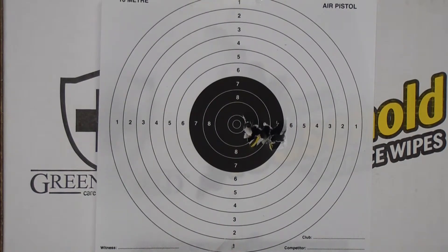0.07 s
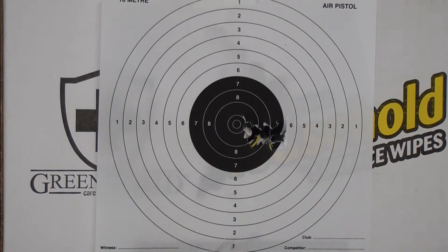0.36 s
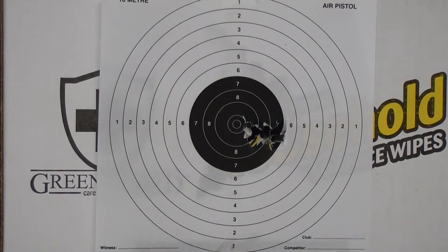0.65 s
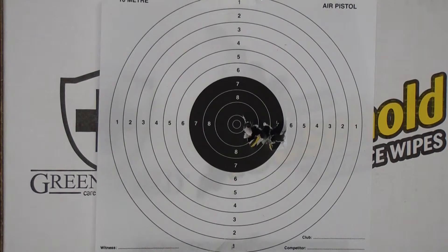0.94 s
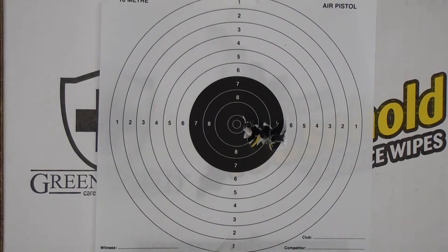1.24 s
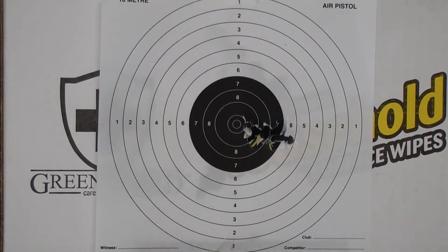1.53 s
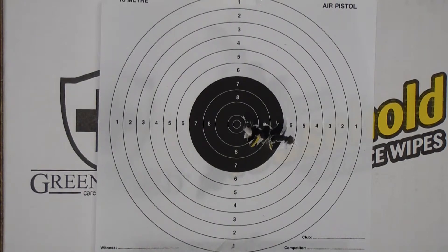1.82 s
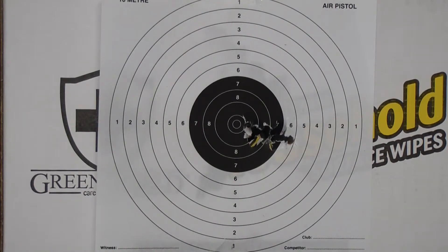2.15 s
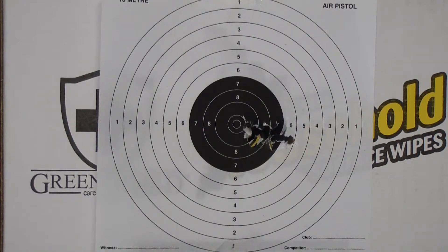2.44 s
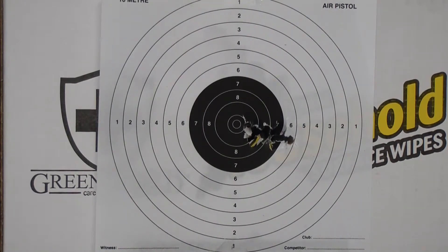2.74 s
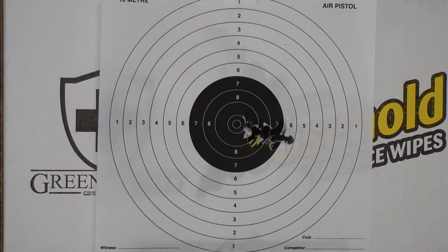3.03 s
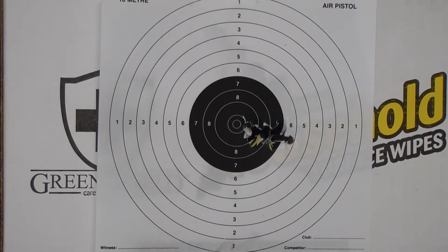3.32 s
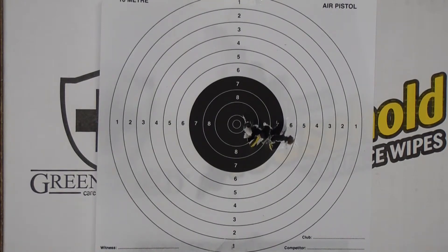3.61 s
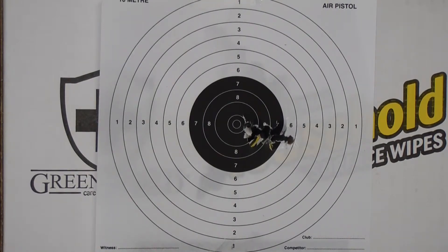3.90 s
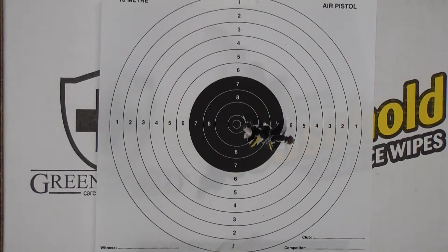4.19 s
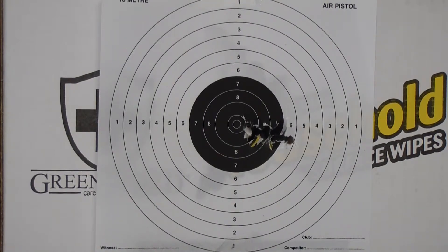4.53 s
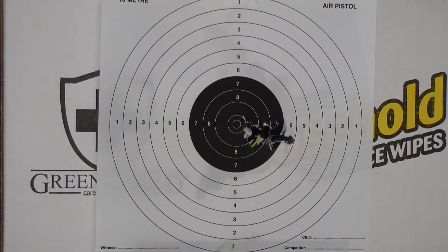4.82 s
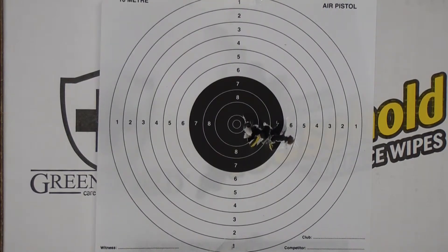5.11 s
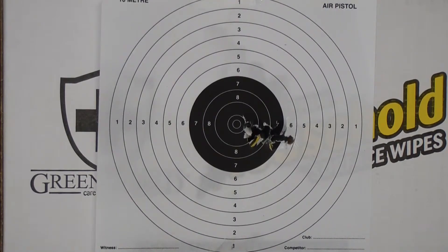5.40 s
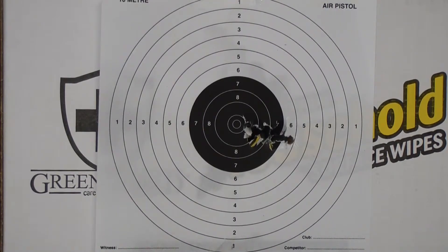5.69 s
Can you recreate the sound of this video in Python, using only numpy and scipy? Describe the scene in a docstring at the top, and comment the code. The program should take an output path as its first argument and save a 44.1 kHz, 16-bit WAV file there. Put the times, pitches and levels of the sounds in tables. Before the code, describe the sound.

An air pistol fires one sharp crack into a steel trap, then clicks and clacks as it is cocked in a small, bare room.

```python
"""Air pistol in a small, bare room

Heard from beside the target, a pellet tears the paper, slaps into a steel trap, which rings, and drops
inside it while the muzzle blast fills the room. Farther off the action is opened, cocked and shut,
and small parts are handled over a faint hiss. Gain control flattens the loud tails."""
import sys
import numpy as np
from scipy import signal
from scipy.fft import rfft, irfft
from scipy.io import wavfile

SR = 44100
rng = np.random.default_rng(int(sys.argv[2]) if len(sys.argv) > 2 else 0)


def store_pcm(level_fs):
    """Save levels as 16-bit WAV."""
    pcm = np.round(np.clip(level_fs, -1, 1) * 32767).astype(np.int16)
    wavfile.write(sys.argv[1], SR, np.atleast_2d(pcm).T)


N = 253649
TIME = np.arange(N) / SR
HZ = np.maximum(np.arange(SR // 2 + 1), 1.)

# the hand rubbing on the grip: start_s, level_db, duration_s
GRIP_RUBS = [(2.14, -58, 0.0093), (2.401, -48.5, 0.0055), (2.919, -51, 0.03), (3.64, -48.5, 0.052),
             (4.502, -53, 0.05), (4.809, -57, 0.022)]


def muzzle_blast(room):
    """Sudden expansion: a puff of air leaves the muzzle and excites the reverberation of the room."""
    puff = [(1.3447, 7.5, 0.01324)]  # start_s, level_db, duration_s
    colour = [(20, -28), (70, -11), (130, -18.5), (250, -12), (400, -10.5), (560, -9.5), (850, -7.5),
              (1300, -1), (1750, -5), (2200, -6), (3300, -7.5), (4300, -10.5), (7300, -10), (16000, -21)]  # frequency_hz, relative_db
    peaks = [(1106, 44, 2), (1360, 42, -6), (1740, 53, 5), (2326, 60, -3)]  # centre_hz, width_hz, relative_db
    blast = through(bursts(puff), body(colour, peaks, ring_db=0.5))
    return across_room(blast, room, direct_db=10.5)


def pellet_strike():
    """Impact excitation: the pellet tears the paper and sets backing and steel trap in free vibration."""
    tear = [(1.3400, 3, 0.005)]  # start_s, level_db, duration_s
    paper_colour = [(300, -2), (2000, -23), (6000, 1), (16000, -11)]  # frequency_hz, relative_db
    backing_modes = [(468, 3, 0.03), (925, 8, 0.011), (1390, 9, 0.012), (1683, -0.5, 0.048),
                     (2500, -5.5, 0.027)]  # pitch_hz, relative_db, t60_s
    trap_modes = [(1030, -29, 0.27), (1310, -42, 2), (1860, -38, 0.42), (2330, -22.5, 0.71)]  # pitch_hz, level_db, t60_s
    impact_s = 1.3398
    paper = through(bursts(tear), body(paper_colour))
    slap = from_db(-2) * struck(backing_modes, impact_s)
    return paper + slap + struck(trap_modes, impact_s)


def pellet_drop(room):
    """Inelastic collisions: the spent pellet bounces in the trap, more weakly each time."""
    bounces = [(1.6444, -36.5), (1.6948, -43), (1.8126, -49)]  # start_s, level_db
    colour = [(200, -8), (350, -8.5), (550, -9.5), (850, 1), (1400, 0), (2300, -6.5), (4000, -20),
              (8000, -26), (15000, -45)]  # frequency_hz, relative_db
    peaks = [(795, 53, 0), (1040, 50, -5), (1300, 40, -19)]  # centre_hz, width_hz, relative_db
    drops = through(bursts(lasting(bounces, seconds=0.0022)), body(colour, peaks, ring_db=-0.5))
    return across_room(drops, room, direct_db=29.5)


def action(room):
    """Impacts excite resonances: lever knocks, sear snaps, breech clacks shut and shakes the spring."""
    # blows: start_s, level_db
    lever_knocks = [(2.3015, -32), (2.7065, -51.5)]
    sear_snaps = [(2.4684, -19)]
    breech_clacks = [(2.7885, -26)]
    # spectral envelopes: frequency_hz, relative_db
    lever_colour = [(120, -28), (300, -14.5), (620, -2.5), (970, -7.5), (1400, 2), (1900, 7), (2150, -2.5),
                    (2500, -1.5), (4000, -6), (8500, -17), (11000, -29), (16000, -35)]
    sear_colour = [(100, -39), (400, -31), (620, -17.5), (830, -22.5), (1300, -13), (2300, -5), (3000, -9),
                   (4600, -8.5), (7500, -3), (9500, -8), (13000, -13.5), (16000, -4)]
    breech_colour = [(60, -39), (150, -24), (270, -17.5), (400, -3.5), (630, -7.5), (1000, -9), (1250, -6),
                     (1900, -3.5), (3800, -8), (5000, -12.5), (8700, -21), (10500, -36), (16000, -39)]
    spring_colour = [(2000, -28), (9000, -1), (12000, -6), (14500, 2), (16000, -6)]
    # resonances: centre_hz, width_hz, relative_db
    lever_peaks = [(1432, 60, 4), (1922, 90, -8.5)]
    sear_peaks = [(2420, 180, -0.5), (8500, 290, -4)]
    breech_peaks = [(516, 53, -2.5), (1225, 100, 1.5), (1708, 40, 0.5), (1916, 99, -3.5), (2620, 100, -1),
                    (2820, 50, -5), (3700, 190, -9), (4000, 150, 2.5)]
    spring_rattles = [(2.79, -47.5, 0.014), (2.86, -52, 0.034)]  # start_s, level_db, duration_s
    lever = through(seating(lever_knocks), body(lever_colour, lever_peaks, ring_db=8))
    sear = through(seating(sear_snaps), body(sear_colour, sear_peaks, ring_db=2.5))
    breech = through(seating(breech_clacks), body(breech_colour, breech_peaks, ring_db=5.5))
    spring = through(bursts(spring_rattles, swell=True), body(spring_colour))
    return (across_room(lever + breech + spring, room, direct_db=24.5)
            + across_room(sear, room, direct_db=20.5))


def small_parts():
    """Contact and friction: metal parts tick, slide after a push and scrape with each rub of the grip."""
    ticks = [(1.958, -58), (2.394, -48), (2.703, -54), (3.825, -49), (3.999, -49), (4.345, -52.5),
             (4.602, -48)]  # start_s, level_db
    pushes = [(3.595, -44.5, -47), (4.033, -45.5, -47.5), (4.396, -51, -52), (4.488, -46.5, -53)]  # start_s, touch_db, slide_db
    colour = [(100, -47), (400, -33.5), (650, -7.5), (1300, -6), (2300, -1), (3300, -6), (5000, -5.5),
              (8500, -9), (11000, -14.5), (16000, -22.5)]  # frequency_hz, relative_db
    peaks = [(2460, 98, 0)]  # centre_hz, width_hz, relative_db
    slide_delay_s, slide_s = 0.028, 0.014
    touches = lasting(ticks + [(s, db) for s, db, _ in pushes], seconds=0.0048)
    slides = [(s + slide_delay_s, db, slide_s) for s, _, db in pushes]
    scrapes = [(s, db - 3, duration) for s, db, duration in GRIP_RUBS]
    force = bursts(touches + slides + scrapes, swell=True, lumps_db=6.5)
    return through(force, body(colour, peaks, ring_db=-3))


def grip_rub():
    """Sliding friction: the hand draws soft swells of noise from the grip."""
    colour = [(150, -27), (450, -12.5), (650, -16), (1000, -7), (1750, -0.5), (2600, -5.5), (6000, -22),
              (16000, -32)]  # frequency_hz, relative_db
    peaks = [(1940, 300, -5)]  # centre_hz, width_hz, relative_db
    return through(bursts(GRIP_RUBS, swell=True, lumps_db=0.5), body(colour, peaks))


def catch_snap():
    """Uneven friction: a catch slides home in two stages, exciting its resonances."""
    stages = [(4.627, -38, 0.00367), (4.646, -38, 0.0077)]  # start_s, level_db, duration_s
    colour = [(300, -19), (650, -14), (1400, -9.5), (2000, -4.5), (2500, -2), (3200, -6.5), (4000, -1),
              (5500, -7), (8800, -8), (11000, -14.5), (16000, -22)]  # frequency_hz, relative_db
    peaks = [(2370, 47, 0.5), (2620, 60, -6), (3620, 140, -1)]  # centre_hz, width_hz, relative_db
    return through(bursts(stages, swell=True, lumps_db=4.5), body(colour, peaks, ring_db=2))


def background(room):
    """Noise floor: stationary hiss and a thin electrical whine, with soft low bumps before the shot."""
    hiss_colour = [(12, -46), (20, -4), (77, -2.5), (113, -7), (210, -4), (328, -8.5), (780, -12),
                   (949, -14.5), (1260, -11), (1860, -10), (2080, -6.5), (3070, -17.5), (4540, -14.5),
                   (5080, -18), (16000, -27.5)]  # frequency_hz, relative_db
    hiss_peaks = [(1250, 120, 1.5), (2083, 52, 3), (3720, 1040, -3), (4500, 400, -26)]  # centre_hz, width_hz, relative_db
    whine_tones = [(1567, -80), (2067, -79), (3483, -86), (4689, -79.5), (7827, -90)]  # pitch_hz, rms_db
    soft_bumps = [(.37, -63, 0.024), (.635, -59.5, 0.0051)]  # start_s, level_db, duration_s
    bump_colour = [(30, -10), (70, 10.5), (200, 3), (350, -23), (1000, -36), (4000, -65)]  # frequency_hz, relative_db
    white = rng.standard_normal(N + SR // 2 - 1)
    hiss = signal.fftconvolve(white, body(hiss_colour, hiss_peaks, ring_db=4.0), "valid")
    whine = sum(np.sqrt(2) * from_db(db) * np.sin(2 * np.pi * hz * TIME) for hz, db in whine_tones)
    bumps = through(bursts(soft_bumps), body(bump_colour))
    return from_db(-61.5) * hiss + whine + through(bumps, room)


def room_response(build_s, late_db, late_stretch):
    """Reverberation: wall echoes and a diffuse tail with a double decay, whose treble dies first."""
    early_decay = [(80, .29), (250, .28), (500, .29), (1300, .31), (3000, .295), (7000, .275), (11000, .23),
                   (16000, .185)]  # frequency_hz, t60_s
    wall_echoes = [(.0052, 5.6), (.0068, 16.3), (0.0148, 14)]  # delay_s, level_db
    t = TIME[:SR]
    white = np.exp(2j * np.pi * rng.random(len(HZ))) * np.sqrt(SR)
    centres_hz = np.geomspace(60, 16000, 12)
    tail = 0
    for hz, share in zip(centres_hz, np.eye(len(centres_hz))):
        band = irfft(white * np.interp(np.log(HZ), np.log(centres_hz), share))
        fall_db = -60 * t / at_hz(early_decay, hz)
        tail = tail + band * np.hypot(from_db(fall_db), from_db(late_db + fall_db / late_stretch))
    tail = tail * (1 - np.exp(-t / build_s))
    for delay_s, db in wall_echoes:
        tail[round(delay_s * SR)] += from_db(db)
    return tail


def across_room(x, room, direct_db):
    """Direct plus reverberant field: the farther the source, the weaker the direct part."""
    return from_db(direct_db) * x + through(x, room)


def bursts(rows, swell=False, lumps_db=0):
    """Broadband excitation: spurts of micro-clicks die away; sliding ones swell and catch in lumps."""
    out = np.zeros(N)
    t = TIME[:SR // 4]
    for start_s, db, duration_s in rows:
        age = t / max(duration_s, 3e-4)
        envelope = np.exp(-age) * (age if swell else 1)
        grains = rng.standard_normal(len(t)) * envelope
        for _ in range(3):  # flatten the spectrum, then confine the burst in time again
            phase = np.angle(rfft(grains, 2 * len(t)))
            grains = irfft(np.exp(1j * phase))[:len(t)] * (envelope / envelope.max()) ** (1 / 4)
        lumps = smooth(rng.standard_normal(len(t)), 0.00087)
        grains = grains * from_db(lumps_db * lumps / lumps.std())
        start = round(start_s * SR)
        out[start:start + len(t)] += from_db(db) * unit_energy(grains)[:N - start]
    return out


def seating(rows, lead_s=0.005, touch_db=-10.5, touch_s=0.0017, seat_s=0.0054):
    """Double impact: a moving part touches lightly, then seats with its full weight."""
    touches = [(s - lead_s, db + touch_db, touch_s) for s, db in rows]
    return bursts(touches + lasting(rows, seat_s))


def lasting(rows, seconds):
    """Equal contact time for every event."""
    return [(s, db, seconds) for s, db in rows]


def struck(modes, start_s):
    """Modal vibration: damped sinusoids set off at one moment."""
    t = np.maximum(TIME - start_s, 0)
    begun = TIME >= start_s
    return begun * sum(from_db(db - 60 * t / t60) * np.cos(2 * np.pi * hz * t) for hz, db, t60 in modes)


def body(colour, peaks=(), ring_db=0):
    """Minimum-phase response: a broad spectral envelope with resonances standing out of it."""
    lift = 1 + sum(from_db(ring_db + db) ** 2 / (1 + (2 * (HZ - hz) / width) ** 2)
                   for hz, width, db in peaks)
    magnitude = from_db(at_hz(colour, HZ)) * np.sqrt(lift)
    cepstrum = irfft(np.log(magnitude))
    cepstrum[1:SR // 2] *= 2  # folding the cepstrum makes the response causal
    cepstrum[SR // 2 + 1:] = 0
    response = irfft(np.exp(rfft(cepstrum)))
    return unit_energy(response[:SR // 2])


def through(x, response):
    """Convolution with an impulse response."""
    return signal.fftconvolve(x, response)[:N]


def smooth(x, seconds):
    """Exponential averaging by a one-pole lag."""
    pole = np.exp(-1 / (seconds * SR))
    return signal.lfilter([1 - pole], [1, -pole], x)


def at_hz(points, hz):
    """Interpolation on a log-frequency axis."""
    frequencies, values = np.transpose(points)
    return np.interp(np.log(hz), np.log(frequencies), values)


def from_db(db):
    """Decibels to amplitude ratio."""
    return 10 ** (np.asarray(db) / 20)


def unit_energy(x):
    """Normalisation to an energy of one."""
    return x / np.sqrt(np.sum(x ** 2) + 1e-20)


def gain_control(x, threshold_db, lag_s, window_s, treble):
    """Compression: gain falls as treble-weighted power exceeds the threshold."""
    power = smooth(x ** 2 + (treble * np.diff(x, prepend=0)) ** 2, window_s)
    excess_db = np.maximum(10 * np.log10(power + 1e-12) - threshold_db, 0)
    return x * from_db(-smooth(excess_db, lag_s))


def scene():
    """Superposition: the sources add in one small, live room; the nearby strike is heard direct."""
    room = room_response(build_s=0.0015, late_db=-9, late_stretch=1.513)
    shot = muzzle_blast(room) + pellet_strike() + pellet_drop(room)
    cocking = action(room)
    handling = across_room(small_parts() + grip_rub() + catch_snap(), room, direct_db=20)
    return (shot + cocking + handling + background(room))[None]


def record(dry):
    """Dynamic range reduction: slow levelling, fast limiting and soft saturation, then a low-pass."""
    ceiling, cutoff_hz = 0.22, 15900
    levelled = gain_control(dry, threshold_db=-27.5, lag_s=0.013, window_s=0.0091, treble=0.54)
    limited = gain_control(levelled, threshold_db=-14.0, lag_s=0.0046, window_s=0.00077, treble=3.25)
    saturated = ceiling * np.tanh(limited / ceiling)
    return signal.sosfilt(signal.ellip(10, .1, 80, cutoff_hz, fs=SR, output="sos"), saturated)


dry = scene()
out = record(dry)
store_pcm(out)
```